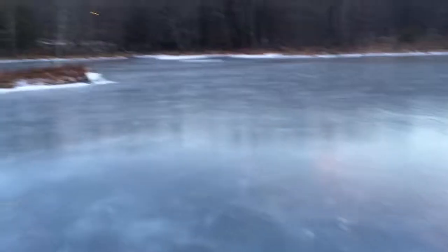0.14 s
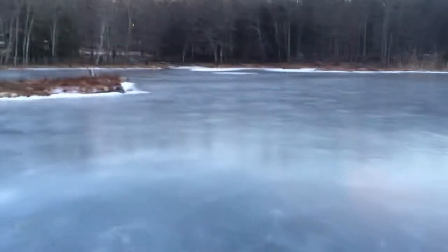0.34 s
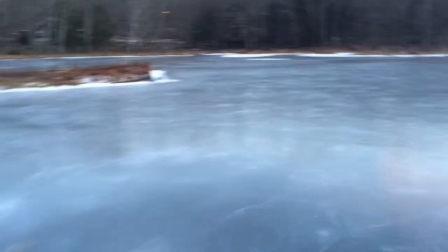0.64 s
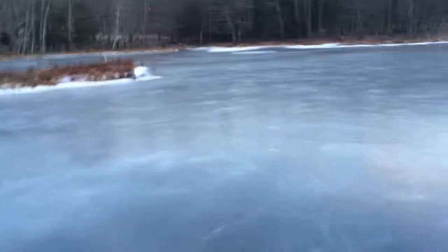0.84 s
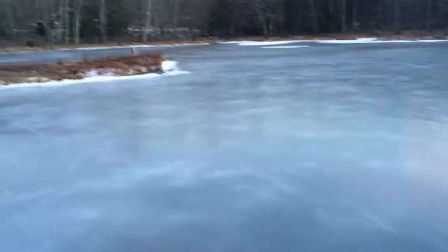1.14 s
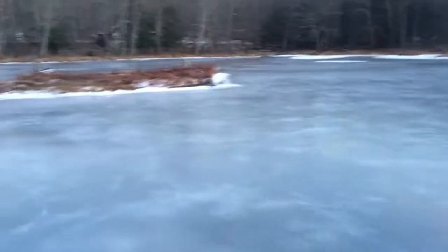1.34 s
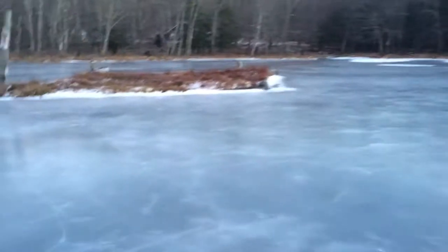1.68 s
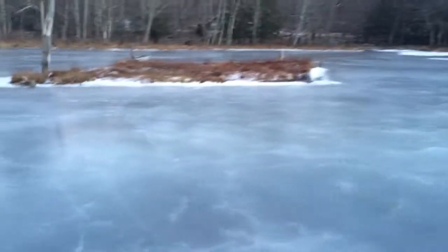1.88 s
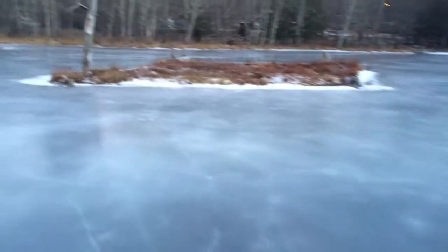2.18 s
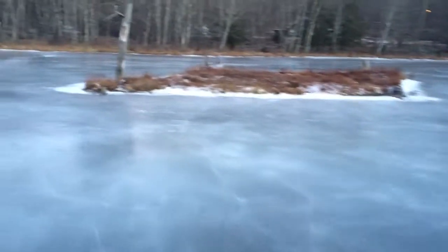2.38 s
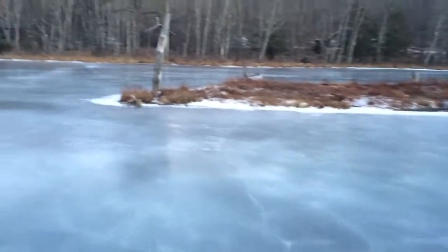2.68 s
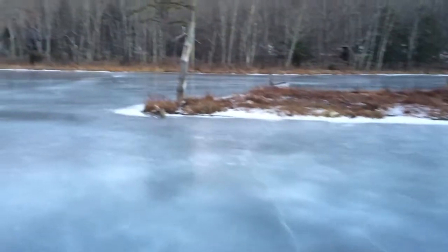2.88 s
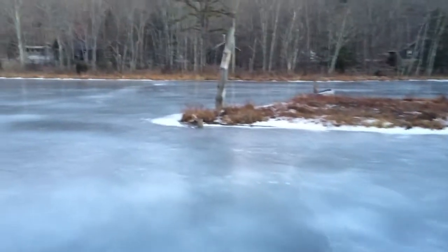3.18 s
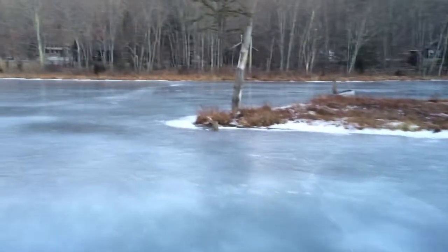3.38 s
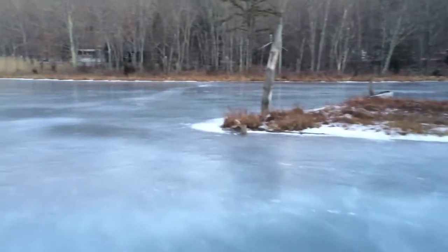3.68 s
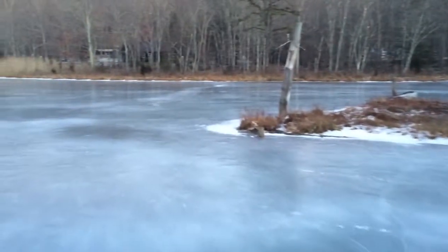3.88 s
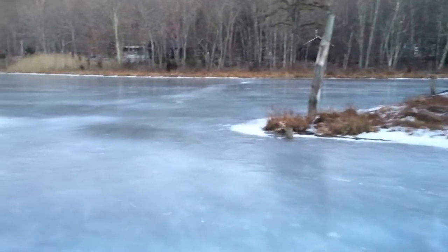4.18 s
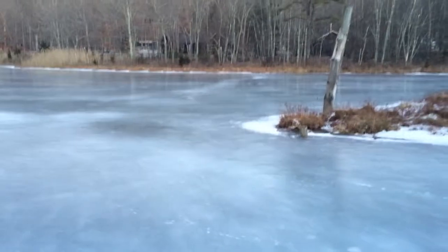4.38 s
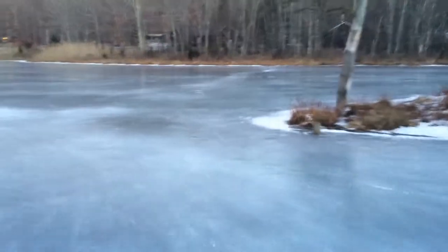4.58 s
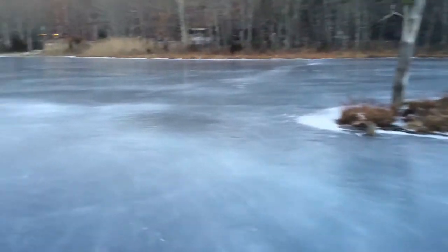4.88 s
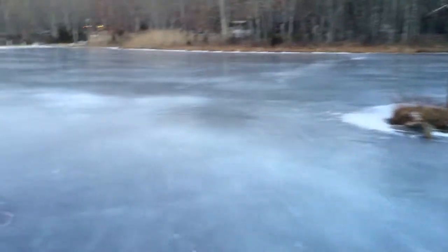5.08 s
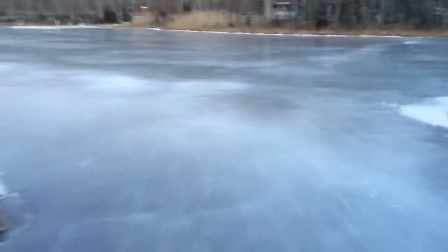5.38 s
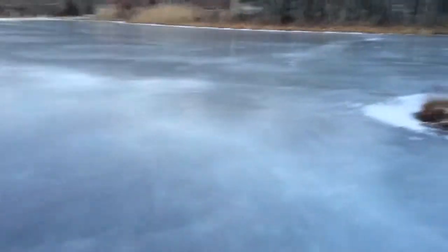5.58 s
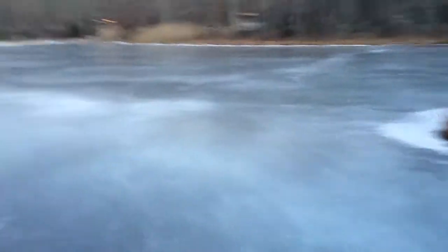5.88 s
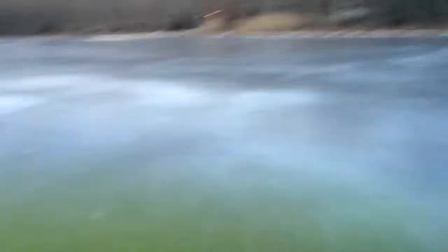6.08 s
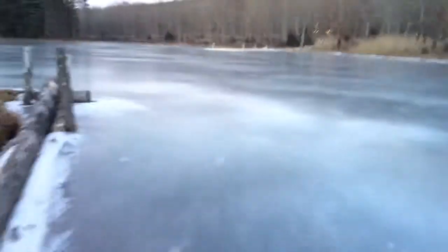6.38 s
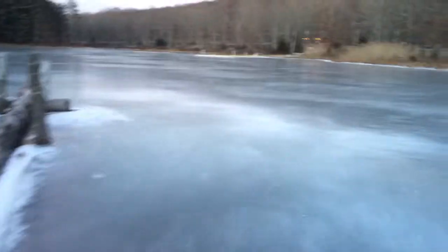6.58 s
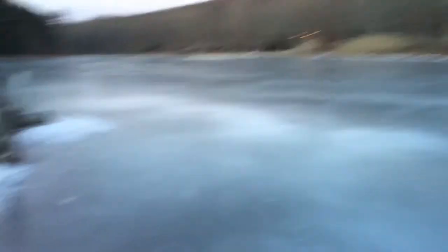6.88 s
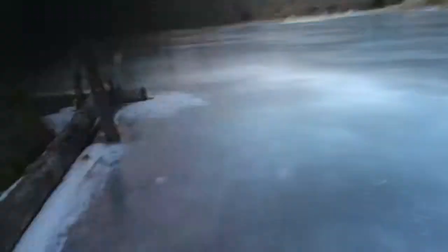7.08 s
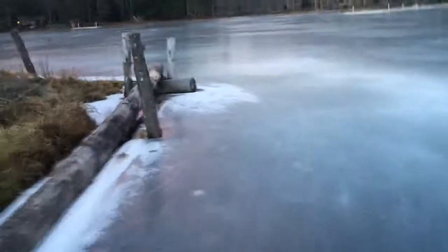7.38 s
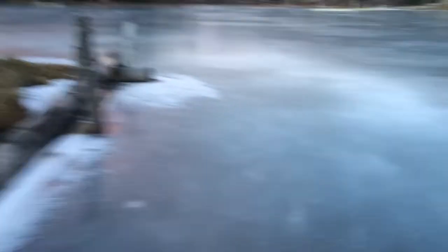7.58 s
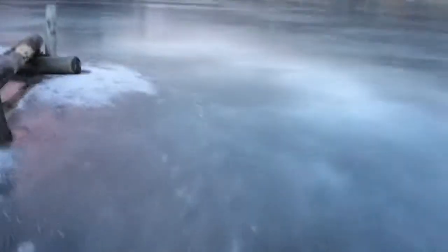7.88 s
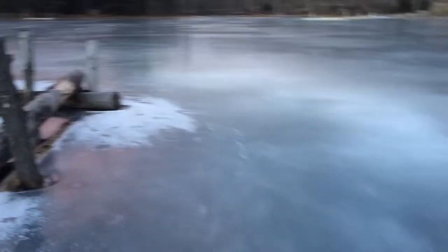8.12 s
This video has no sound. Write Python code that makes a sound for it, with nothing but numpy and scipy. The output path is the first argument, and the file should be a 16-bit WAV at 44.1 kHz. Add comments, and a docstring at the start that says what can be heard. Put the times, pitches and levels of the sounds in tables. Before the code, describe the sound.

Skate blades on a frozen lake, heard close from the skater's hand. Hard, damped clacks with low thuds and gritty scrapes open the scene, then a long soft glide of ticking, chattering steel. Strides return with denser, louder clacks, crunches and brief metallic rings. Lumpy low wind rumble brushes the moving microphone; open air, no echo.

```python
"""Skates clack on ridges of a frozen lake: a few strides, a long glide, then more strides, heard from the hand.
Each clack is a damped ring of blade and boot with a low thud and a noisy crack of chipped ice.
Between the clacks the blades tick and chatter softly, and there are gritty scrapes and short blade rings,
all made of shaped noise. Falling tones and a low murmur are the ice sheet drumming under the skater's weight.
Low noise that swells in lumps is air rumbling on the moving microphone."""
import sys
import numpy as np
from scipy import signal
from scipy.fft import rfft, irfft, next_fast_len
from scipy.io import wavfile
from scipy.ndimage import uniform_filter1d, map_coordinates

SR = 44100
rng = np.random.default_rng(int(sys.argv[2]) if len(sys.argv) > 2 else 0)


def bounce(signal):
    """Save signal as a 16-bit WAV file at the path given by the first command-line argument."""
    frames = np.transpose(np.atleast_2d(signal))
    limited = np.clip(frames, -1, 1)
    pcm = np.round(limited * 32767).astype(np.int16)
    wavfile.write(sys.argv[1], SR, pcm)


N = 363825  # length [samples]

# the steady rub, fading as the glide slows and returning with the strides:
# (time [s], friction level [dB], hiss level [dB])
RUB_LEVELS = [(0, -46, -51.5), (.25, -48, -57.5), (.7, -44.5, -56), (1.15, -45.5, -55), (1.6, -44.5, -55),
              (2.05, -47, -58.5), (2.9, -49.5, -58.5), (3.5, -52.5, -62.5), (4.7, -49.5, -59),
              (5.2, -50.5, -59.5), (5.5, -45.5, -54.5), (6.05, -46.5, -59.5), (6.55, -43.5, -54),
              (6.75, -48.5, -68), (7.1, -45, -58), (7.6, -47.5, -57.5), (8.25, -49.5, -57)]
# how far the blade is tipped: (time [s], tilt [0 = flat glide, 1 = pushing edge])
EDGE_TILT = [(0, 0.87), (1.5, 0.64), (1.8, 0.033), (5.15, 0.38), (5.3, 0.94), (8.25, 1)]
# tone colour of the spray of shavings: (frequency [Hz], level [dB])
SPRAY_COLOUR = [(2000, -37), (3400, -0.5), (4100, 3), (5300, 1), (6400, -1.5), (7000, -2.5), (7900, -1.5),
                (11000, -5.5), (15500, -7)]


def amp(db):
    """Turn decibels into a gain."""
    return 10 ** (np.asarray(db) / 20)


def unit(x):
    """Scale a signal to an rms (average strength) of 1."""
    return x / np.sqrt(np.mean(x ** 2) + 1e-20)


def along(points, hz):
    """Read a curve of (frequency [Hz], value) points along a logarithmic frequency axis."""
    f, v = np.transpose(points)
    return np.interp(np.log(hz + 1), np.log(f + 1), v)


def curve(rows, axis=1):
    """Draw straight lines through one column of (time [s], value, ..) rows, one value per sample."""
    table = np.transpose(rows)
    return np.interp(np.arange(N) / SR, table[0], table[axis])


def wobble(rate):
    """A smooth random curve with this many random points a second."""
    return map_coordinates(rng.standard_normal(4096), [np.arange(N) * rate / SR], mode="wrap")


def swell(s, half, shape=2):
    """A rise and fall around time s; a higher shape has a flatter top and steeper sides."""
    distance = np.abs(np.arange(N) / SR - s) / half
    return np.exp(-.5 * np.minimum(distance, 10) ** shape)


def coloured(x, spectrum):
    """Filter x to a tone colour and scale it to rms 1."""
    m = next_fast_len(len(x) + 8192)
    gain = amp(along(spectrum, np.fft.rfftfreq(m, 1 / SR)))
    return unit(irfft(rfft(x, m) * gain, m)[:len(x)])


def struck(db):
    """A ring of energy 1 that starts at the blow and has these levels on an even frequency grid."""
    cepstrum = irfft(np.log(amp(db)))
    half = len(cepstrum) // 2
    # folding the cepstrum forward puts the energy as early as possible (minimum phase)
    folded = np.r_[cepstrum[0], 2 * cepstrum[1:half], np.zeros(half)]
    ring = irfft(np.exp(rfft(folded)))
    return ring / np.linalg.norm(ring)


def add(track, s, sound):
    """Mix a sound into a track at time s."""
    part = track[max(round(s * SR), 0):][:len(sound)]
    part += sound[:len(part)]


def wind():
    """Air buffets the moving microphone in quick lumps, harder as the hand swings."""
    # air streaming past: (time [s], level [dB])
    stream = [(0, -67.5), (1.5, -63), (2.6, -59.5), (4.4, -62), (8.25, -59.5)]
    # stronger moments: (middle [s], level [dB], half length [s])
    gust_table = [(2.267, -53, 0.12), (4.72, -52.5, 0.055), (5.736, -44, 0.035), (6.757, -43, 0.082),
                  (7.164, -51, 0.048), (7.392, -37, 0.016), (7.902, -52, 0.092), (8.063, -31, .012)]
    # tone colour of the rumble: (frequency [Hz], level [dB])
    rumble = [(15, -42), (35, -13), (55, -1), (80, 0.5), (115, -3), (200, -19.5), (500, -61)]
    lumps = unit(amp(3.0 * wobble(18)))
    gust_power = sum((amp(db) * swell(s, half)) ** 2 for s, db, half in gust_table)
    strength = np.sqrt(amp(curve(stream)) ** 2 + gust_power)
    return strength * lumps * coloured(rng.standard_normal(N), rumble)


def drumming():
    """The ice sheet flexing under a moving blade: an uneven low murmur of rms 1."""
    # tone colour of the murmur: (frequency [Hz], level [dB])
    murmur = [(70, -37), (130, -0.5), (190, 1.5), (380, -5.5), (600, -10), (1200, -34)]
    flex = unit(amp(3.6 * wobble(80)))
    return flex * coloured(rng.standard_normal(N), murmur)


def booms(fall_s=0.01, low_hz=130):
    """Weight drops on the sheet; its high bending waves arrive first, so each boom falls in pitch."""
    # (time [s], level [dB], starting pitch [Hz], time to fade by 60 dB [s])
    drops = [(.838, -10.5, 360, 0.014), (1.301, -21.5, 357, 0.02), (2.125, -31.5, 330, 0.021),
             (2.303, -37, 293, 0.047), (5.742, -7, 343, 0.0052), (6.841, -10.5, 358, 0.022),
             (8.051, -28.5, 300, 0.042)]
    out = np.zeros(N)
    t = np.arange(SR // 5) / SR
    for s, db, hz, t60 in drops:
        phase = 2 * np.pi * np.cumsum(hz / (1 + t / fall_s)) / SR
        add(out, s, amp(db) * np.sin(phase) * amp(-60 * t / t60))
    # the longest waves hardly reach the air
    return signal.lfilter(*signal.butter(2, low_hz, "high", fs=SR), out)


def grit(spectrum, patchy_db=4.0):
    """Thousands of tiny fractures a second over a smooth rub; the colour shifts as the contact travels."""
    chips = (rng.random(N) < 3000 / SR) * rng.standard_normal(N)
    rub = .8 * rng.standard_normal(N)
    z = signal.stft(unit(chips) + rub, nperseg=512)[2]
    # random patches, smoothed over frequency and then over time
    field = uniform_filter1d(rng.standard_normal(z.shape), size=4, axis=0)
    field = uniform_filter1d(field, size=8, axis=1)
    # the treble is less patchy
    depth = along([(3000, 1), (7000, .6)], np.fft.rfftfreq(512, 1 / SR))[:, None]
    patchy = signal.istft(z * amp(patchy_db * depth * unit(field)), nperseg=512)[1][:N]
    return coloured(patchy, spectrum)


def chatter(rate, steady):
    """Each ripple in the ice loads the blade at once and lets go within milliseconds: a gain of rms 1."""
    t = np.arange(SR // 20) / SR
    load = np.zeros(N)
    for k, (early, size, life) in enumerate(rng.random((round(rate * N / SR), 3))):
        push = amp(-34 * size ** .55) * np.exp(-t / (.0013 + .004 * life))
        add(load, (k + 1 - 2 * early) / rate, push)
    # the skater's weight is constant, so the load evens out over a few ripples
    usual = np.abs(uniform_filter1d(load, size=SR // 10)) + load.mean()
    return unit(np.sqrt(load / usual + steady))


def friction():
    """Blades chatter over rippled ice; on edge they shave it more evenly, and the sheet drums along."""
    # tone colours of a flat glide and of a shaving edge: (frequency [Hz], level [dB])
    gliding = [(150, -19), (300, -14.5), (480, -7), (650, -7.5), (770, -13.5), (1000, 0), (1650, -0.5),
               (2000, -5), (2600, -8.5), (3300, -16.5), (5000, -61)]
    shaving = [(150, -31), (300, 2), (420, -5.5), (600, 1), (770, -9), (1030, -0.5), (1700, 0.5),
               (2200, -4.5), (2550, -1), (3150, -7), (3550, -21.5), (5500, -96)]
    edge = np.clip(curve(EDGE_TILT), 0, 1)
    friction_db = curve(RUB_LEVELS)
    # steady load that stays between ripples, more of it on edge
    pressure = chatter(rate=70, steady=0.09 + 0.07 * edge)
    glide = np.sqrt(1 - edge) * grit(gliding, patchy_db=2)
    shave = np.sqrt(edge) * grit(shaving) * amp(-2.5)
    rub = pressure * amp(friction_db) * (glide + shave)
    hiss = unit(pressure ** .8) * amp(curve(RUB_LEVELS, axis=2)) * grit(SPRAY_COLOUR)
    # drumming 14 dB under the friction level, 2.5 dB more on a full edge
    sheet = amp(friction_db - 14 + 2.5 * edge) * drumming()
    return rub + hiss + sheet


def scuffs():
    """An edge digs in: dense crunch, bright spray, drumming sheet, now and then a short blade ring."""
    # an edge pushes off and throws up shavings:
    # (middle [s], crunch level [dB], spray level [dB], drumming level [dB], half length [s])
    pushes = [(0.01, -43.5, -63, -49, 0.029), (0.336, -36.5, -46, -54, 0.019),
              (0.518, -32.5, -45.5, -46, 0.039), (0.83, -45, -64, -48.5, 0.065),
              (1.342, -37.5, -49.5, -48.5, 0.058), (2.768, -42, -53, -73, 0.017),
              (5.384, -36, -50, -54, 0.066), (5.847, -37, -47.5, -52, 0.021),
              (6.194, -40, -51.5, -44.5, 0.038), (6.348, -39, -47, -56, 0.037),
              (6.42, -27.5, -48, -53, 0.015), (6.472, -34.5, -48.5, -70, 0.04),
              (6.849, -34.5, -43.5, -41.5, .025), (7.139, -42.5, -45.5, -57, .028),
              (7.451, -37, -49.5, -42, 0.053), (7.56, -38.5, -48, -58, 0.02), (7.929, -31, -46, -36, 0.017),
              (7.969, -27, -38.5, -51, 0.013), (8.036, -29.5, -45.5, -43, 0.0082),
              (8.216, -35, -58, -52, 0.025)]
    # the steel blade rings briefly near 2.7 kHz, mostly as it strikes: (middle [s], level [dB])
    ring_table = [(5.985, -36), (6.305, -29.5), (6.484, -29.5), (6.685, -27), (6.823, -30), (7.028, -27.5),
                  (7.283, -30), (7.596, -35), (7.691, -35.5)]
    # tone colours of the crunch and of the blade ring: (frequency [Hz], level [dB])
    rasp = [(150, -10), (300, -3.5), (600, -3), (770, -8), (1030, 1), (1700, 2.5), (2200, -3), (2550, -5),
            (3150, -16), (3550, -14), (5500, -75)]
    steel = [(1500, -4), (2400, 6.5), (2750, 8.5), (3100, -4), (3500, -20), (5000, -28.5)]
    crunch, spray, sheet = np.zeros((3, N))
    for s, crunch_db, spray_db, sheet_db, half in pushes:
        # steeper than a bell: the edge bites, holds and lets go abruptly
        bite = swell(s, half, shape=2.9)
        crunch += amp(crunch_db) * bite
        spray += amp(spray_db) * bite
        sheet += amp(sheet_db) * bite
    # the shaving is uneven
    slips = unit(amp(3 * wobble(260)))
    ring_strength = sum(amp(db) * swell(s, half=0.0033) for s, db in ring_table)
    crunching = slips * crunch * grit(rasp, patchy_db=4)
    spraying = unit(slips ** 0.95) * spray * grit(SPRAY_COLOUR)
    ringing = ring_strength * coloured(rng.standard_normal(N), steel)
    return crunching + spraying + sheet * drumming() + ringing


def clack(hz, thud_db, crack_db, ring_db=7, rattle=0.061, rattle_t60=0.024, size=4096):
    """One blow: a heavily damped ring of blade and boot, a low thud and the crack of chipped ice."""
    # tone colours of boot ring, thud and ice crack: (frequency [Hz], level [dB])
    boot = [(80, -31), (300, -4), (430, 3), (600, -3.5), (950, 5.5), (1400, 5), (1900, 3), (2250, -3.5),
            (2950, 0.5), (3500, -19), (4600, -33), (15000, -49)]
    low_thud = [(20, -11), (90, -17), (170, -1.5), (300, 13.5), (450, 12.5), (800, -26), (3000, -19)]
    ice_crack = [(1500, -7), (4000, 11.5), (5000, 4), (6600, 9.5), (8000, 2.5), (11000, 2), (15500, -4.5)]
    t = np.arange(size) / SR
    f = np.fft.rfftfreq(size, 1 / SR)
    resonance = ring_db / (1 + (np.log((f + 1) / hz) / .24) ** 2)
    # every contact point along the blade has its own peaks and notches
    ripple = 2.5 * map_coordinates(rng.standard_normal(size), [f / 300])
    ring = 3.03 * struck(along(boot, f) + resonance + ripple)
    ring = ring + amp(thud_db + 14.5) * struck(along(low_thud, f) + ripple)
    # a fading burst of noise repeats the ring as a loose rattle
    loose = rattle * rng.standard_normal(size) * amp(-60 * t / rattle_t60) * (1 - np.exp(-t / 0.00022))
    ring = ring + signal.fftconvolve(ring, loose)[:size]
    # the ice gives way just after first contact, then crumbs settle
    crumbling = amp(-60 * t / 0.0055) + 0.14 * amp(-60 * t / 0.029)
    chipping = (1 - np.exp(-t / 0.0012)) * crumbling
    return ring + amp(crack_db + 8.5) * coloured(rng.standard_normal(size), ice_crack) * chipping


def ticks(count):
    """Small bumps tap the blade at uneven intervals, harder under more friction and on a pushing edge."""
    out = np.zeros(N)
    # above a friction of -46 dB the ticks grow no more
    force_db = np.minimum(curve(RUB_LEVELS), -46) + 8.5 * curve(EDGE_TILT)
    for k, (when, size, pitch, chip) in enumerate(rng.random((count, 4))):
        at = int((k + 2 * when) / (count + 1) * (N - 1))
        db = force_db[at] + 8 + 9 * size ** 2
        tap = clack(1100 + 1400 * pitch ** 2, thud_db=-37, crack_db=-18 - 11 * chip,
                    rattle=0.029, rattle_t60=0.019)
        add(out, at / SR, amp(db) * tap)
    return out


def blows():
    """Hard clacks of the strides, each with a light graze before it and a runner's ping, and ticks between."""
    # a blade strikes the ice: (time [s], blow level [dB], ring pitch [Hz],
    # crack level relative to the blow, before the lift inside clack() [dB])
    strikes = [(0.177, -4, 1000, -28.5), (0.201, -18.5, 1370, -38), (0.292, -21.5, 1080, -16),
               (0.39, -18.5, 1600, -27), (0.431, -11.5, 1450, -31), (0.691, -22, 1040, -22),
               (0.744, -1, 1250, -29), (0.769, -9, 980, -34), (0.783, -12, 990, -25),
               (0.795, -18, 1150, -29), (0.825, -12.5, 1440, -23), (0.838, -8.5, 1100, -17.5),
               (0.999, -23, 1000, -24), (1.164, -17.5, 1010, -23), (1.253, -14.5, 1730, -22),
               (1.302, -9.5, 880, -26), (1.34, -11.5, 810, -23), (1.349, -14.5, 970, -17.5),
               (1.395, -8.5, 1120, -24.5), (1.476, -9.5, 935, -25.5), (1.56, -26, 1430, -10.5),
               (1.642, -17.5, 1090, -25), (1.787, -30, 1300, -9), (2.124, -24, 1000, -22),
               (3.001, -24.5, 1570, -19), (3.188, -23.5, 1730, -31), (3.532, -29, 1650, -13),
               (4.011, -27, 1420, -26), (4.345, -26.5, 1300, -18), (4.404, -15, 1130, -22),
               (4.586, -20.5, 1190, -38), (4.979, -20.5, 1190, -18), (5.416, -14, 1040, -18.5),
               (5.663, -14.5, 950, -24), (5.698, -15.5, 890, -21), (5.742, -11.5, 860, -15.5),
               (5.799, -16.5, 1080, -25), (6.061, -7.5, 1200, -24.5), (6.091, -20, 1070, -18),
               (6.142, -19, 1060, -20), (6.304, -4.5, 1160, -25.5), (6.682, -11, 1170, -48),
               (6.72, -19.5, 1270, -25), (6.839, -19.5, 1186, 0.5), (7.024, -3, 1330, -45),
               (7.054, -22.5, 1340, -23), (7.121, -6.5, 1240, -28), (7.144, -10, 1020, -14),
               (7.171, -1.5, 1520, -21), (7.279, -2, 1440, -29.5), (7.469, -17, 1570, -35),
               (7.614, -6, 950, -29), (7.715, -7.5, 980, -33.5), (7.838, -14.5, 1310, -23.5),
               (7.864, -19.5, 1230, -19), (7.922, -8, 796, -18.5), (8.187, -9, 969, -34),
               (8.205, -12, 1160, -25), (8.228, -15.5, 1130, -27)]
    thud_db, thud_growth = -41, 0.48  # thud setting of a 0 dB blow [dB]; dB of thud per dB of blow
    graze_s, graze_db, graze_limit_db = 0.0033, -17.5, -32  # lead [s], relative and loudest level [dB]
    steel_hz, steel_db, steel_t60 = 3058, -20, 0.015  # ping: pitch [Hz], relative level [dB], 60 dB fade [s]
    out = np.zeros(N)
    t = np.arange(SR // 10) / SR
    for s, db, hz, crack_db in strikes:
        relative_thud_db = thud_db + thud_growth * db - db
        add(out, s, amp(db) * clack(hz, relative_thud_db, crack_db, ring_db=6.0))
        # the blade grazes the ridge just before it strikes
        graze = clack(hz, thud_db=-35, crack_db=-23)
        add(out, s - graze_s, amp(min(db + graze_db, graze_limit_db)) * graze)
        # the ping shifts a little with the load on the runner
        ping_hz = steel_hz * (1 + .025 * rng.standard_normal())
        ping = np.sin(2 * np.pi * ping_hz * t)
        add(out, s, amp(db + steel_db - 60 * t / steel_t60) * ping)
    return out + ticks(count=190)


def scene():
    """Everything is close and dry: open ice gives no echo."""
    return (wind() + booms() + friction() + scuffs() + blows())[None]


def record(dry):
    """The microphone keeps nothing above its band limit."""
    top_hz = 15500
    m = next_fast_len(N + 8192)
    kept = np.fft.rfftfreq(m, 1 / SR) < top_hz
    return irfft(rfft(dry, m) * kept, m)[..., :N]


dry = scene()
out = record(dry)
bounce(out)
```